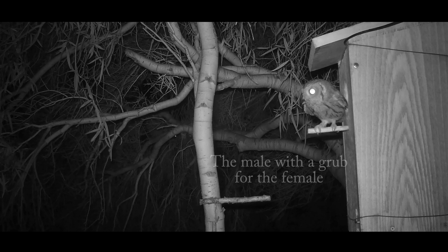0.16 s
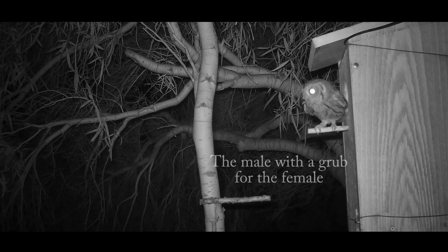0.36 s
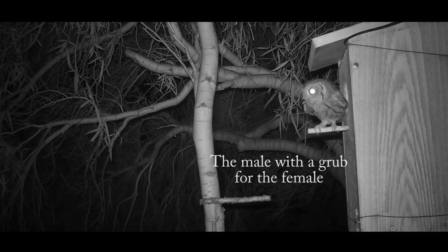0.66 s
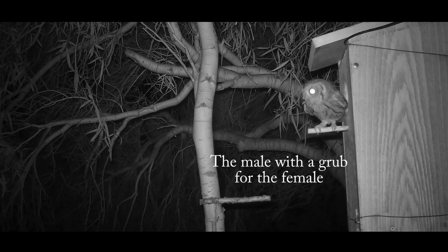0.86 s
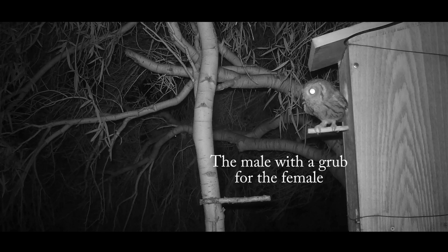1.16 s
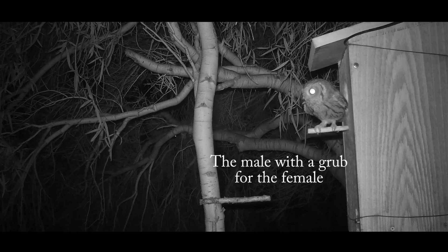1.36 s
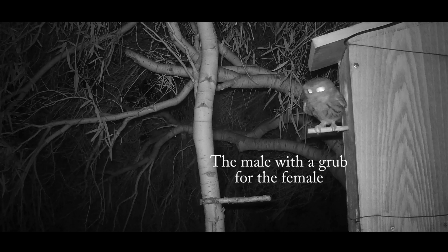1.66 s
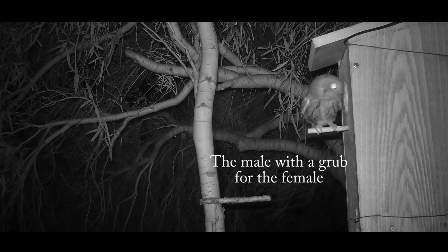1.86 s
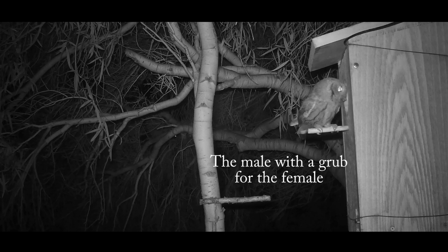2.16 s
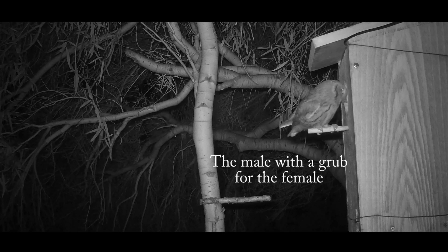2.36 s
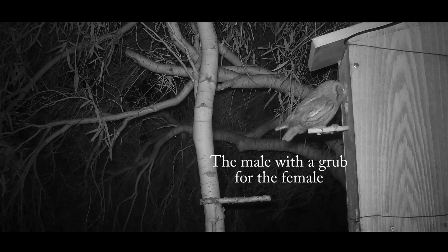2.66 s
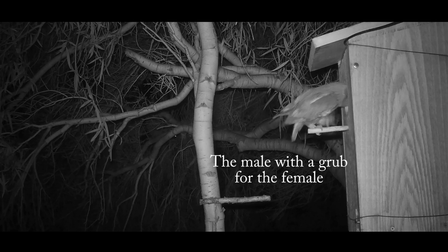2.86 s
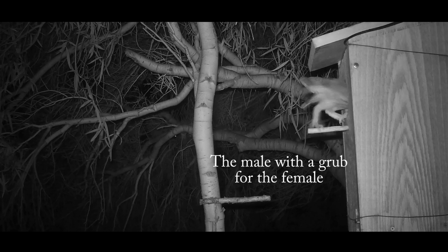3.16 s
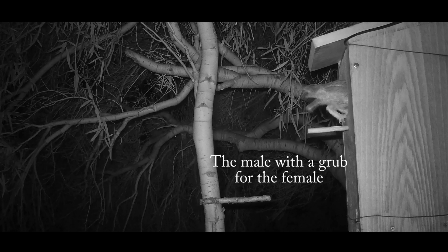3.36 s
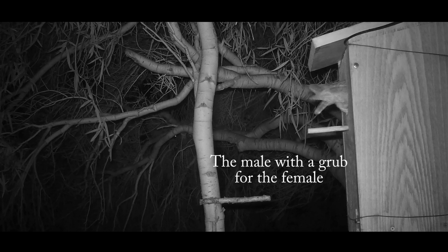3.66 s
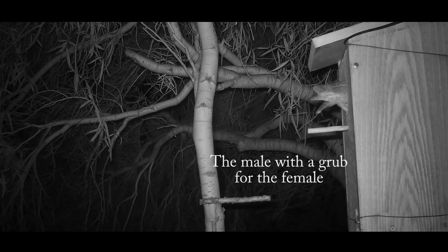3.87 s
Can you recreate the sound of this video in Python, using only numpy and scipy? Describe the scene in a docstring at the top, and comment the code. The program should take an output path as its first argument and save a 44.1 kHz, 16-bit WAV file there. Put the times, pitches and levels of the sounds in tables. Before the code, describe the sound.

A small owl gives two soft hollow trills at night amid ticking drips and steady hiss.

```python
"""Night at a wooden nest box: drips tick on leaves and wood throughout, over distant rumble and microphone hiss.
A faint moan of narrow noise wavers for the first 1.5 s, and claws and feathers begin to scrape the box.
From 1.5 s a small owl on the perch gives a soft trill of short, breathy near sines, then from 2.4 s
a second, slower one that ends near 3.6 s. Drips are dying rings, crackle and bursts of resonant noise;
the air is shaped random spectra. Owl and drips lie to the right and reach the left port a little later."""
import sys
import numpy as np
from scipy import signal
from scipy.fft import rfft, irfft
from scipy.io import wavfile
from scipy.ndimage import uniform_filter1d

SR = 44100
rng = np.random.default_rng(int(sys.argv[2]) if len(sys.argv) > 2 else 0)


def to_wav(s):
    """Save 16-bit WAV."""
    ch = np.atleast_2d(s).T  # columns
    pcm = np.round(np.clip(ch, -1, 1) * 32767)  # PCM
    wavfile.write(sys.argv[1], SR, pcm.astype(np.int16))


def ratio_of_db(decibels):
    """Turn decibels (scalar or array-like) into linear amplitude factors; 0 dB maps to 1."""
    return 10 ** (np.asarray(decibels, float) / 20)


N = 176400  # 4 s

# Colour of the night air and hiss. Each row: frequency in Hz, relative density in dB per Hz.
AIR_SPECTRUM = [(18, -44), (30, -19), (40, -12), (53, -20), (211, -32), (321, -32.5), (512, -29),
                (956, -38), (4440, -40.5), (6740, -35), (8740, -43), (12600, -47.5), (15100, -50.5)]
# How alike the air is in both ports. Each row: frequency in Hz, common share from 0 to 1.
AIR_SHARED = [(30, 0.79), (140, 0.9), (500, 0.87), (1200, 0.68), (2700, 0.07), (4300, 0.11), (5600, 1),
              (7300, 0.092), (10000, 0.058), (15000, 0.8)]
# Balance of the air. Each row: frequency in Hz, left minus right in dB.
AIR_TILT = [(60, -4), (120, 2.5), (240, -3), (480, -5.5), (950, -2), (1890, -2), (3770, -2), (7520, -2.5),
            (15000, -2.0)]
# Delay between the ports. Each row: frequency in Hz, lag of the left port in radians.
LEFT_LAG = [(0, 0), (1100, 0.76), (2700, 2), (4300, 4), (6500, 5), (9200, 11), (12000, 12), (16000, 15.5)]
# Electrical offset, left then right. Each row: start and end in full scale, time constant in seconds.
CHANNEL_OFFSET = [(-.002, -0.033, 0.87), (.006, -0.031, 1.24)]
# The loudest drips. Each row: time in seconds, peak in dB, colour in Hz.
LOUD_TICKS = [(0.037, -36, 6590), (0.058, -35, 6960), (0.095, -42, 5330), (0.132, -36, 6200),
              (0.181, -46, 6400), (.272, -44, 7300), (0.3252, -41.5, 6600), (.368, -47, 6300),
              (0.5487, -40, 6810), (.577, -41, 6540), (0.655, -38, 5100), (0.73, -47, 6710),
              (0.756, -35.5, 5900), (0.8056, -44, 6900), (0.836, -42, 7040), (0.9311, -36.5, 5700),
              (1.06, -40.5, 5000), (1.105, -44, 6140), (1.1452, -36.5, 6000), (1.272, -38.5, 6770),
              (1.343, -40.5, 6750), (1.4053, -43.5, 6630), (1.542, -41, 6000), (1.591, -40, 6760),
              (1.7427, -38.5, 6440), (1.7845, -39, 6570), (1.895, -42, 6500), (1.949, -37, 6540),
              (2.0426, -37.5, 7000), (2.133, -44.5, 6800), (2.155, -41, 7000), (2.1828, -42.5, 5960),
              (2.41, -43.5, 6200), (2.4343, -42, 5960), (2.463, -41, 6240), (2.503, -40, 6600),
              (2.564, -37.5, 6530), (2.6716, -49, 6410), (2.6976, -34, 6500), (2.711, -29, 7100),
              (2.727, -45, 7100), (2.758, -49, 5740), (2.7876, -41, 6710), (2.7985, -38, 8900),
              (2.8075, -38.5, 6550), (2.8753, -41, 6600), (2.946, -40, 6500), (2.9861, -43, 6200),
              (3.0463, -43.5, 5800), (3.0694, -39, 6600), (3.141, -37, 6330), (3.175, -41, 6500),
              (3.3071, -34, 6800), (3.455, -35.5, 6800), (3.689, -42, 6100), (3.7315, -38.5, 6460),
              (3.768, -41.5, 6400), (3.804, -44, 8900), (3.8468, -35, 7000), (3.9, -44, 6600),
              (3.9684, -41.5, 6650)]
# Dry snaps that reach the top of the treble. Each row: time in seconds, peak in dB.
DRY_SNAPS = [(.9343, -40), (.9832, -42), (1.0594, -50), (1.0999, -47), (2.3062, -38), (2.7117, -36),
             (2.7975, -40), (2.9861, -37), (3.3069, -42), (3.6554, -41), (3.689, -38), (3.7249, -44)]
# Short bursts of rustling leaves. Each row: start in seconds, length in seconds, level in dB.
LEAF_RUSTLES = [(.04, .07, -55), (.185, .04, -58), (.657, .028, -57.5), (.695, .025, -58),
                (.759, .027, -55), (.812, .042, -56), (.905, .047, -56.5), (1.14, .04, -55.5),
                (2.05, .06, -59), (2.17, .07, -57.5), (2.714, .035, -55), (2.805, .06, -57),
                (3.85, .065, -56.5)]
# Claws and feathers on the box. Each row: start in seconds, length in seconds, level in dB,
# centre in Hz, width in Hz.
BOX_SCRAPES = [(1.394, 0.054, -61, 1340, 500), (2.68, 0.021, -52.5, 2970, 1500),
               (2.686, 0.012, -49.5, 4700, 1100), (2.68, 0.02, -50, 6600, 1400),
               (2.814, 0.032, -51.5, 3440, 2500), (2.905, 0.12, -62, 945, 500),
               (3.443, 0.039, -60.5, 1490, 900), (3.518, 0.018, -52.5, 3080, 2000),
               (3.678, 0.014, -54, 4200, 1200)]
# Faint moan near the owl's pitch. Each row: time in seconds, pitch in Hz, level in dB.
MOAN_CURVE = [(0.0, 657, -60), (0.128, 440, -57.5), (0.388, 530, -84), (0.818, 480, -59.5),
              (0.844, 454, -80), (1.148, 563, -62), (1.164, 515, -80), (1.243, 435, -55), (1.29, 514, -91),
              (1.5, 503, -61)]
# Notes of both trills. Each row: start in seconds, length in seconds, level in dB, pitch in Hz.
TRILL_NOTES = [(1.528, 0.03, -60, 495), (1.588, 0.019, -55, 510), (1.655, 0.028, -48.5, 523),
               (1.726, 0.026, -44, 544), (1.796, .028, -44, 551), (1.867, 0.027, -41.5, 555),
               (1.937, 0.03, -41.5, 551), (2.007, 0.025, -41, 564), (2.08, 0.023, -41, 570),
               (2.15, .022, -39.5, 587), (2.219, 0.02, -41.5, 596), (2.288, 0.021, -48.5, 578),
               (2.445, 0.024, -58, 603), (2.49, 0.04, -58, 610), (2.623, 0.041, -44.5, 553),
               (2.71, 0.04, -45.5, 545), (2.809, 0.048, -45, 538), (2.908, .044, -46.5, 540),
               (3.015, 0.042, -50, 540), (3.116, 0.025, -49.5, 535), (3.207, .026, -52, 537),
               (3.296, 0.025, -51.5, 537), (3.366, 0.03, -52, 533), (3.434, 0.029, -52.5, 535),
               (3.498, 0.032, -54, 530), (3.558, 0.03, -54.5, 528)]
# Overtones of a full-voiced note. Each row: multiple of the pitch, level in dB against the fundamental.
OWL_OVERTONES = [(2, -18.5), (3, -26.5), (4, -39)]

AIR_DB, PATCH_DB, SWELL_DB = -50.5, 1.8, 0.34  # rms of the air, of its patches and of its swell
TICK_CYCLES, GRAIN_CYCLES, SNAP_CYCLES, SNAP_HZ = 6.4, 12, 1.8, 11000
TICK_LATE_S = 0.0008
TICK_PAN_DB, SCRAPE_PAN_DB, OWL_PAN_DB = -8, -3.5, -5.5  # left minus right
TICK_WET_DB, TICK_T60_S = -5.5, 0.022
PORT_HZ, PORT_WIDTH_HZ, SPREAD_HZ = 6600, 1400, 450  # resonance of crackle and leaves; wander of the crackle
CRACKLE_DB, CRACKLE_T60_S, CRACKLE_PER_S = -17.5, 0.12, 600
PATTER_PER_S, PATTER_DB, PATTER_SPREAD_DB, CLUMP_DB = 220, -58, 2.3, 2.2
PATTER_LOW_HZ, PATTER_HIGH_HZ = 5300, 8200
SNAP_SHARE, FAINT_SNAP_DB = 0.25, -1  # share of the patter that is dry snaps, and their trim
MOAN_WIDTH_HZ = 130
RISE_S, FALL_SHARE, FADE_DB_PER_S = 0.02, 0.8, 45  # the fall is a share of the note's length
SAG_HZ_PER_S, DROOP_HZ, WAVER_HZ, WOBBLE_DB = 450, 50, 3, 0.8
BREATH_DB, BREATH_WIDTH_HZ = -22, 220
FULL_DB, THIN = -42, 1.6  # overtones lose THIN dB for each dB under full voice and each step up
PURE_DB_PER_S = 500  # drawn-out notes are purer
OWL_WET_DB, OWL_T60_S = -14, 0.25


def evened(x):
    """Scales to rms 1."""
    return x / np.sqrt(np.mean(x ** 2) + 1e-20)


def wander(count, span):
    """Smoothed noise of rms 1: a slow random drift."""
    return evened(uniform_filter1d(rng.standard_normal(count), span))


def read(points, hz):
    """Reads a spectrum on a log frequency axis."""
    f, value = np.transpose(points)
    return np.interp(np.log(hz + 1), np.log(f + 1), value)


def add(mix, start, sound, pan_db):
    """Places a mono sound in both channels; negative pan leans right."""
    part = mix[:, max(round(start * SR), 0):][:, :len(sound)]
    gains = ratio_of_db(np.array([[pan_db / 2], [-pan_db / 2]]))
    part += gains * sound[:part.shape[1]]


def resonate(x, hz, width_hz):
    """Two equal resonances in series, each of gain 1, that follow the curve hz."""
    turn = np.exp(2j * np.pi * np.cumsum(hz * np.ones(x.shape[-1])) / SR)
    r = np.exp(-np.pi * width_hz / SR)
    for _ in range(2):
        # shift the centre down to zero, smooth, shift back up
        x = 2 * (turn * signal.lfilter([1 - r], [1, -r], x / turn + 1e-18)).real
    return x


def echoes(x, wet_db, t60, shared):
    """Adds a short tail of scattered reflections, partly shared by the channels."""
    t = np.arange(SR // 4) / SR
    sparse = rng.random((3, len(t))) < 0.1
    tail = rng.standard_normal((3, len(t))) * sparse * ratio_of_db(-60 * t / t60) * (t > 0.001)
    tail = shared * tail[2] + (1 - shared) * tail[:2]
    tail = tail / np.linalg.norm(tail, axis=1)[:, None]
    return x + ratio_of_db(wet_db) * signal.fftconvolve(x, tail, axes=1)[:, :N]


def lag(hz):
    """Phase turn of the left port."""
    return np.exp(-1j * np.interp(hz, *np.transpose(LEFT_LAG)))


def ports(x):
    """Sounds from the right reach the left port a little later, as a phase lag that grows with frequency."""
    hz = np.fft.rfftfreq(N, 1 / SR)
    turns = np.array([lag(hz), np.ones(len(hz))])
    return irfft(rfft(x, axis=1) * turns, N, axis=1)


def air():
    """Night air, rumble and hiss: random short-time spectra with patches and a slow swell."""
    frames, hz = N // 512 + 5, np.fft.rfftfreq(2048, 1 / SR)
    a, b, c, d, patches = rng.standard_normal((frames, 1025, 5)).T
    # patches span 24 bins by 5 frames
    patches = evened(uniform_filter1d(uniform_filter1d(patches, 24, 0), 5, 1))
    swell = wander(frames, 12)
    same = np.clip(read(AIR_SHARED, hz), 0, 1)[:, None]
    right = a + 1j * b
    left = same * right * lag(hz)[:, None] + np.sqrt(1 - same ** 2) * (c + 1j * d)
    tilt = ratio_of_db(read(AIR_TILT, hz) / 2)[:, None]
    colour = ratio_of_db(read(AIR_SPECTRUM, hz)[:, None] + PATCH_DB * patches + SWELL_DB * swell)
    spectra = np.array([left * tilt, right / tilt]) * colour * (hz > 15)[:, None]
    sound = signal.istft(spectra, nperseg=2048, noverlap=1536)[1][:, :N]
    return ratio_of_db(AIR_DB) * evened(sound)


def tick(hz, cycles):
    """One drop's ring: a few dying cycles, peak 1."""
    t = np.arange(300) / SR
    ring = np.sin(2 * np.pi * hz * t) * t * np.exp(-t * hz * 4 / cycles)
    return ring / abs(ring).max()


def patter():
    """Faint random drips: many soft rings and dry snaps, few louder ones, in loose clumps."""
    out = np.zeros((2, N))
    clump = wander(N, 3000)
    for when, size, a, b, side, dryness in rng.random((round(PATTER_PER_S * N / SR), 6)):
        hz = PATTER_LOW_HZ * (PATTER_HIGH_HZ / PATTER_LOW_HZ) ** ((a + b) / 2)
        # a small draw of size gives a loud drip
        level_db = PATTER_DB - PATTER_SPREAD_DB * np.log(size + 0.017) + CLUMP_DB * clump[int(when * N)]
        if dryness < SNAP_SHARE:
            grain = ratio_of_db(FAINT_SNAP_DB) * tick(SNAP_HZ, SNAP_CYCLES)
        else:
            grain = tick(hz, GRAIN_CYCLES)
        add(out, when * N / SR, ratio_of_db(level_db) * grain, TICK_PAN_DB + 3 * side)
    return out


def rustles():
    """Leaves rustle: spiky noise through a resonance, in short bursts."""
    out = np.zeros((2, N))
    for start, length, db in LEAF_RUSTLES:
        leaves = rng.standard_normal(4410) * rng.exponential(1, 4410) ** 2
        leaves = evened(resonate(leaves[:round(length * SR)], PORT_HZ, PORT_WIDTH_HZ))
        add(out, start, ratio_of_db(db) * leaves * signal.windows.tukey(len(leaves), 0.4), TICK_PAN_DB)
    return out


def scrapes():
    """Claws and feathers scrape the box: short resonant bursts of noise."""
    out = np.zeros((2, N))
    for start, length, db, hz, width_hz in BOX_SCRAPES:
        grit = evened(resonate(rng.standard_normal(4410)[:round(length * SR)], hz, width_hz))
        add(out, start, ratio_of_db(db) * grit * np.hanning(len(grit)) ** 0.5, SCRAPE_PAN_DB)
    return out


def loud_drips():
    """Loud ticks, each in a dying crackle of sparse resonant grains, and dry high snaps."""
    out, t = np.zeros((2, N)), np.arange(SR // 8) / SR
    for s, db, hz in LOUD_TICKS:
        grains = rng.standard_normal(len(t)) * (rng.random(len(t)) < CRACKLE_PER_S / SR)
        wander_hz = PORT_HZ + SPREAD_HZ * wander(len(t), 300)
        crackle = evened(resonate(grains, wander_hz, PORT_WIDTH_HZ))
        add(out, s + TICK_LATE_S, ratio_of_db(db) * tick(hz, TICK_CYCLES), TICK_PAN_DB)
        add(out, s, ratio_of_db(db + CRACKLE_DB - 60 * t / CRACKLE_T60_S) * crackle, TICK_PAN_DB)
    for s, db in DRY_SNAPS:
        add(out, s + TICK_LATE_S, ratio_of_db(db) * tick(SNAP_HZ, SNAP_CYCLES), TICK_PAN_DB)
    return out


def drips():
    """Drips, leaves and scrapes share a very short tail of reflections."""
    close = patter() + rustles() + scrapes() + loud_drips()
    return echoes(close, TICK_WET_DB, TICK_T60_S, 0.12)


def moan():
    """A faint moan: noise through a narrow resonance whose pitch and level waver."""
    out, t = np.zeros((2, N)), np.arange(N) / SR
    s, hz, db = np.transpose(MOAN_CURVE)
    voice = evened(resonate(rng.standard_normal(N), np.interp(t, s, hz), MOAN_WIDTH_HZ))
    add(out, 0, voice * ratio_of_db(np.interp(t, s, db, right=-99)), OWL_PAN_DB)
    return out


def trills():
    """Each note is a breathy near sine that swells, sags in pitch and fades; loud notes show overtones."""
    out = np.zeros((2, N))
    for start, length, level_db, pitch_hz in TRILL_NOTES:
        fall = FALL_SHARE * length
        t = np.arange(0, RISE_S / 2 + length + fall / 2, 1 / SR)
        ramp = np.clip(np.minimum(t / RISE_S, (t[-1] - t) / fall), 0, 1)
        shape = np.sin(np.pi / 2 * ramp) ** 2
        # a quick wobble in level and a steady fade
        wobble_turns = 2 * np.pi * (rng.uniform(52, 108) * t + rng.random())
        shape = shape * ratio_of_db(WOBBLE_DB * np.sin(wobble_turns) - FADE_DB_PER_S * (t - t[-1] / 2))

        # pitch wavers throughout, sags steadily and droops at the end
        hz = pitch_hz + WAVER_HZ * wander(4410, 250)[:len(t)] - DROOP_HZ * (t / t[-1]) ** 4
        sag_hz = SAG_HZ_PER_S * (t - RISE_S / 2 - length / 2)
        turns = 2 * np.pi * (np.cumsum(hz - sag_hz) / SR + rng.random())

        breath = evened(resonate(rng.standard_normal(4410), hz.mean(), BREATH_WIDTH_HZ))[:len(t)]
        tone = shape * (np.sin(turns) + ratio_of_db(BREATH_DB) * breath)
        purity_db = PURE_DB_PER_S * max(length - 0.028, 0)
        for k, db in OWL_OVERTONES:
            overtone_db = db + THIN * (k - 1.5) * (level_db - FULL_DB) - purity_db
            tone = tone + ratio_of_db(overtone_db) * shape ** 2 * np.sin(k * turns)
        # the listed start falls midway up the rise
        add(out, start - RISE_S / 2 - 0.001, np.sqrt(2) * ratio_of_db(level_db) * tone, OWL_PAN_DB)
    return out


def owl():
    """The moan and the trills, with a faint tail of reflections common to both channels."""
    return echoes(moan() + trills(), OWL_WET_DB, OWL_T60_S, 1.0)


def scene():
    """Owl and drips from the right, in the night air."""
    return air() + ports(drips() + owl())


def low_pass(x):
    """Removes everything above the highest recorded frequency."""
    return signal.sosfilt(signal.butter(12, 15680, fs=SR, output="sos"), x)


def record(dry):
    """Each channel carries an electrical offset that settles exponentially."""
    t = np.arange(N) / SR
    drift = np.array([end + (start - end) * np.exp(-t / tau) for start, end, tau in CHANNEL_OFFSET])
    return low_pass(dry + drift)


dry = scene()
out = record(dry)
to_wav(out)
```